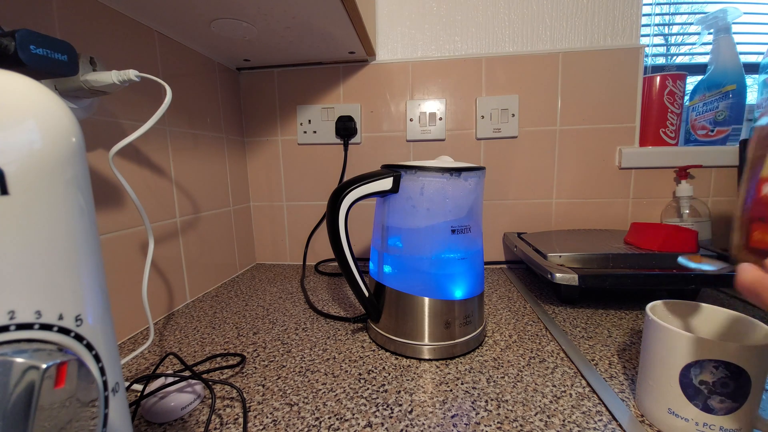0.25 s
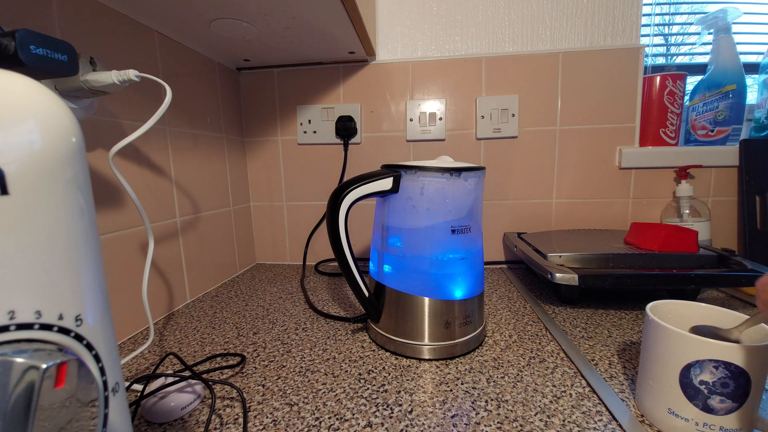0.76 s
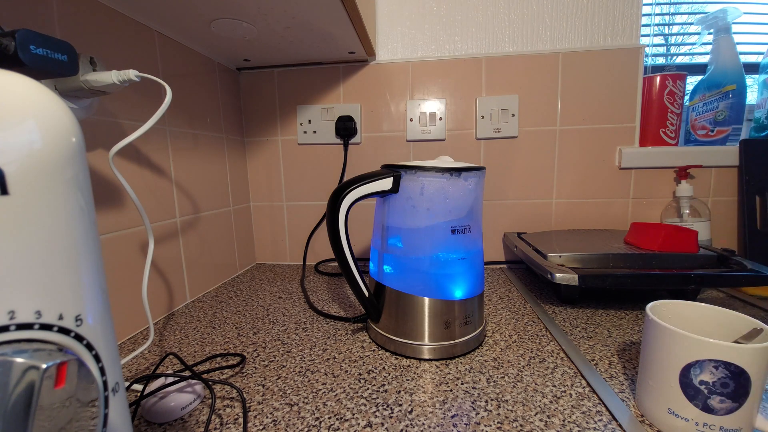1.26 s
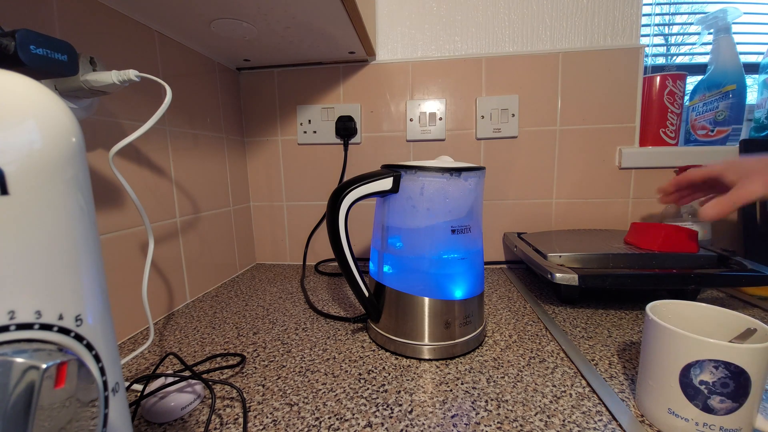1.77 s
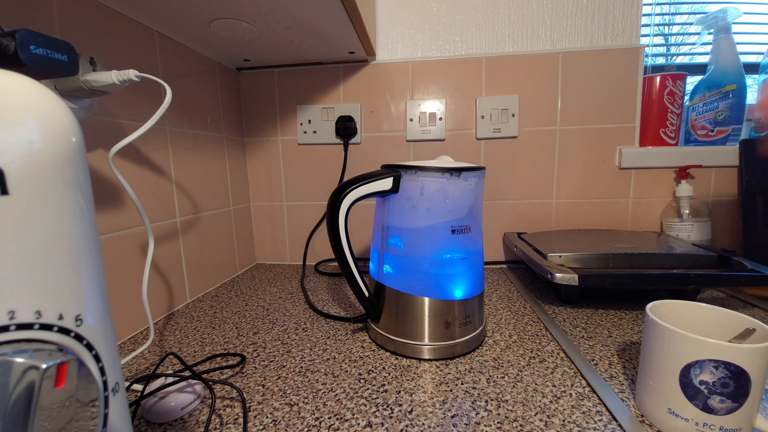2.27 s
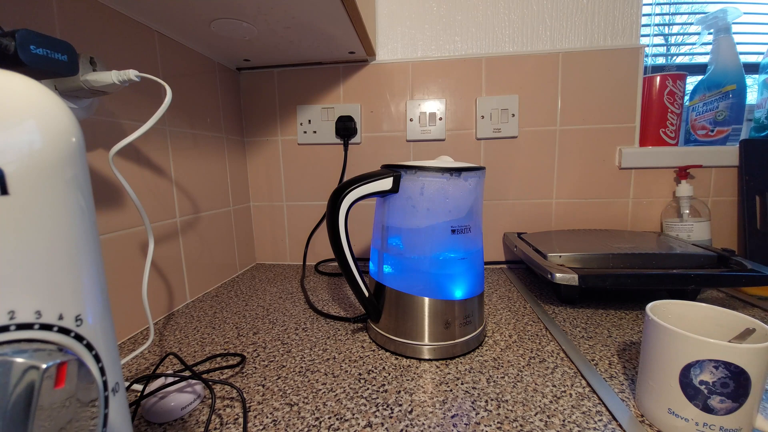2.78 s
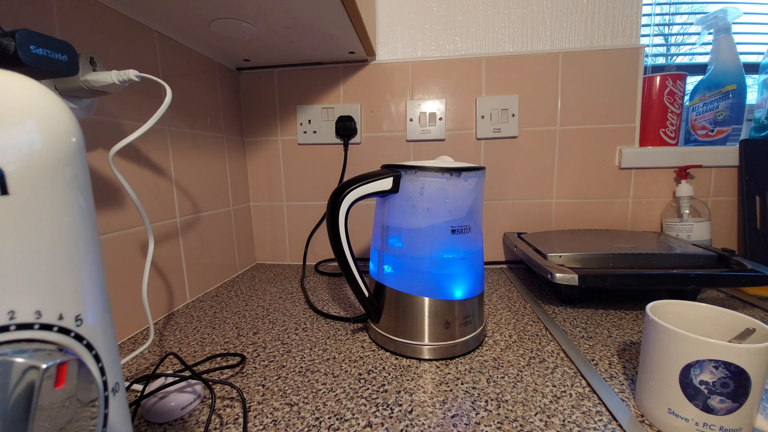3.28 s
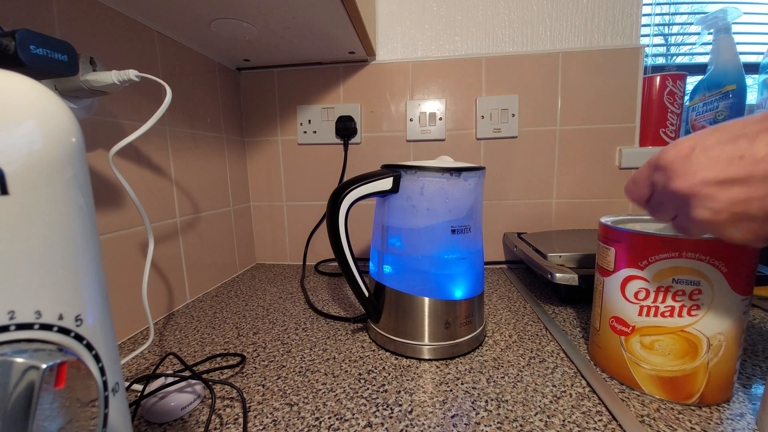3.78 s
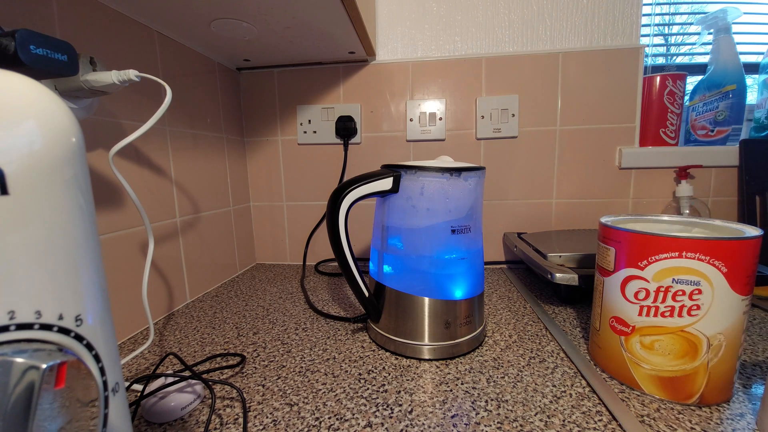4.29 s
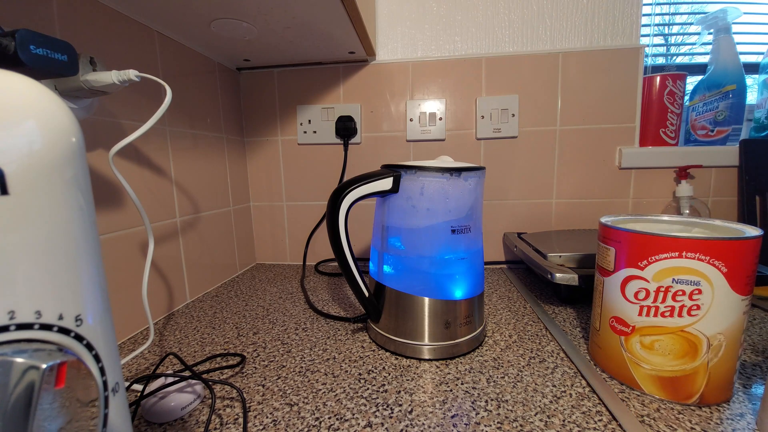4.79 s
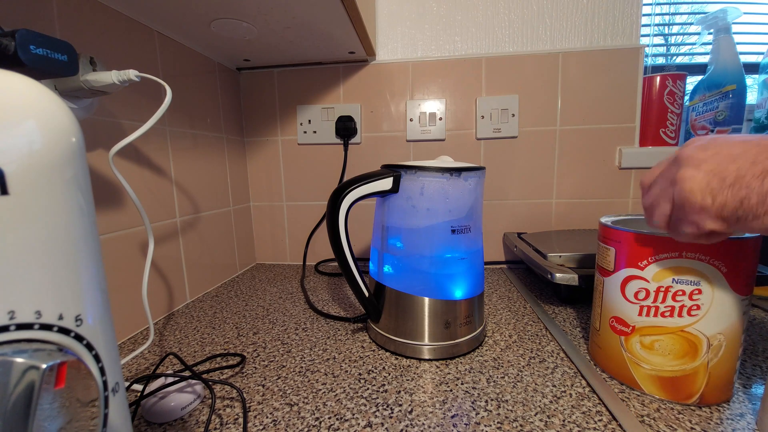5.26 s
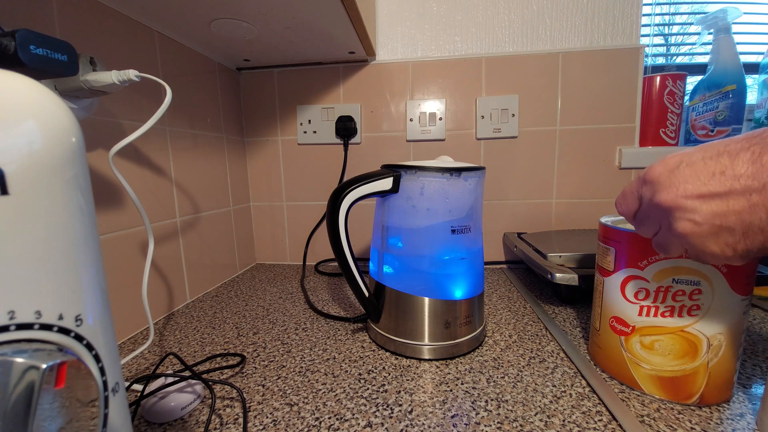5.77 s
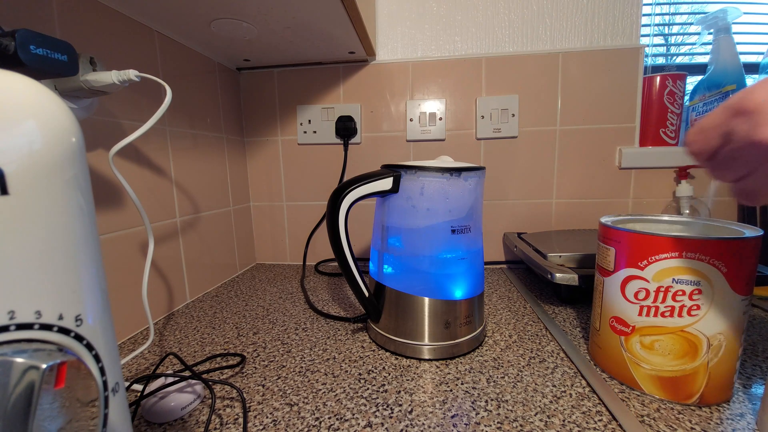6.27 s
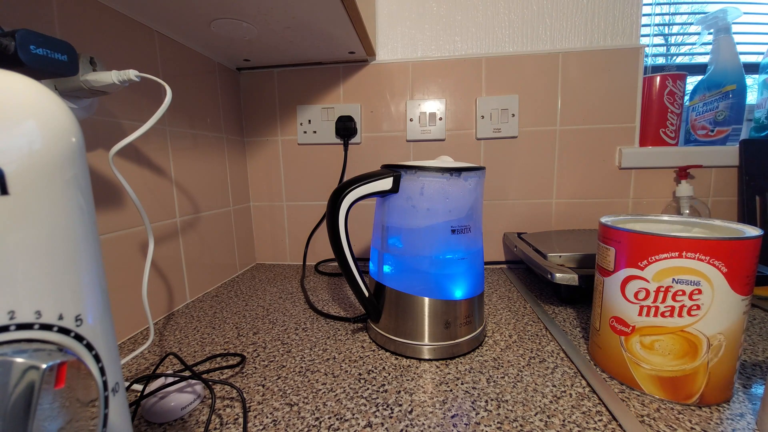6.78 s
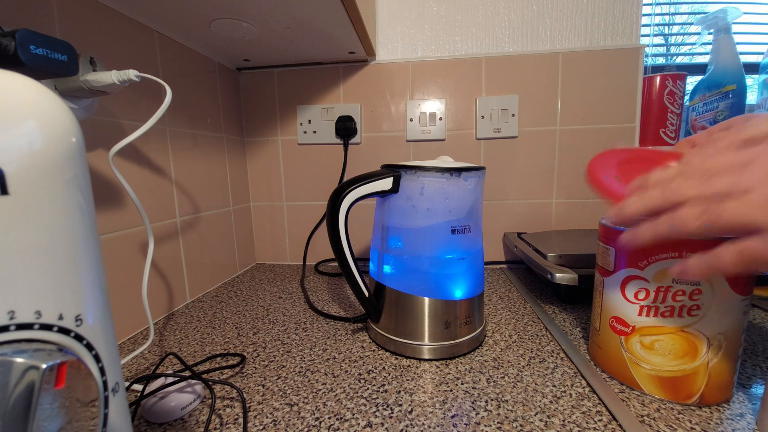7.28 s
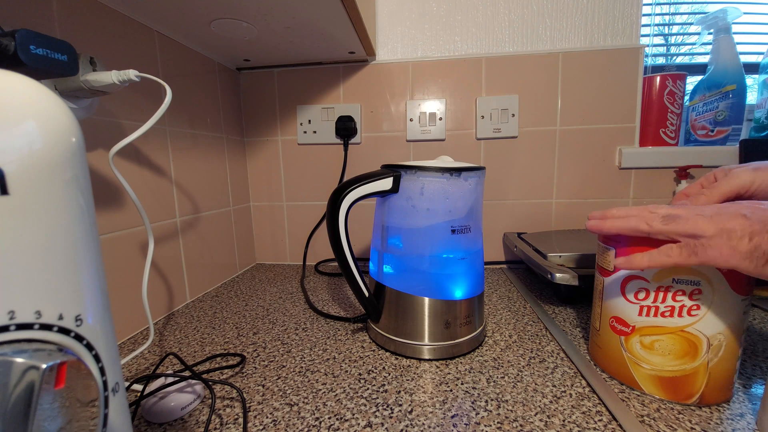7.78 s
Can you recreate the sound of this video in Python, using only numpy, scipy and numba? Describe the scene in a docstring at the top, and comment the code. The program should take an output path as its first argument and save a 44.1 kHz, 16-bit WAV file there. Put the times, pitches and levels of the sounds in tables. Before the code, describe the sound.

A faint hiss and low kettle murmur lie under close handling sounds in a small tiled kitchen, mostly to the right. At about 0.9 seconds a teaspoon touches a mug, then rattles loudly and brightly from 1.1 to 1.3, thudding into the worktop and rocking faintly to rest by 2. After a few soft knocks, a plastic lid cracks and snaps onto a hollow jar from 2.5 to 3.3, loudest near 2.8 and 3.1, with hands and sleeves rustling. At 4.6 the spoon clinks sharply with a hollow thump. A quiet stretch follows, with slight rubbing. Lighter spoon clinks come around 6.8 to 6.9, then hollow taps just after 7. From 7.4 to 8 a plastic lid is pressed onto a tub with several snaps and dull thuds. The kettle swells slightly toward the end but stays faint.

```python
"""A teaspoon clinks and rattles in a mug in a tiled kitchen: each contact rings mug and steel and thuds
into the worktop. Plastic lids are lifted and snapped onto a jar and a tub, cracking over the hollow
of the vessels. Hands and sleeves rustle, and behind them a kettle starts to murmur over a faint hiss.
Spoon and lids sound to the right of a pair of microphones on the worktop."""
import sys
import numpy as np
from scipy import signal
from scipy.fft import rfft, irfft, next_fast_len
from scipy.io import wavfile
from scipy.ndimage import uniform_filter1d
from numba import njit

SR = 44100
rng = np.random.default_rng(int(sys.argv[2]) if len(sys.argv) > 2 else 0)


def waveform_to_disk(signal):
    """Save audio, clipped to [-1, 1], as 16-bit WAV at the path in sys.argv[1]."""
    frames = np.transpose(np.atleast_2d(signal))
    scaled = np.clip(frames, -1, 1) * 32767
    samples = np.round(scaled).astype(np.int16)
    wavfile.write(sys.argv[1], SR, samples)


N = 354733
TIME = np.arange(N) / SR

# modes of worktop and vessels under a blow, low to high: pitch_hz, level_db, t60_s
BOOM_MODES = [(68.6, -20.5, 0.092), (120.7, -8.5, 0.42)]
THUD_MODES = [(184.3, -13.5, 0.16), (232.5, -0.5, 0.21), (278.3, -3.5, 0.37), (318.5, -0.5, 0.15),
              (367, 2, 0.092), (417, 0, .1)]
HOLLOW_MODES = [(513, -2.5, 0.057), (528, -4, 0.12), (578.3, -6, 0.057), (664, -7, 0.1), (782, 3, 0.062),
                (910, -2.5, 0.072), (1011, -3, 0.086)]


def undb(db):
    """Decibels to amplitude."""
    return 10 ** (np.asarray(db) / 20)


def unit(x):
    """Scale to an RMS of 1."""
    return x / np.sqrt(np.mean(x ** 2))


def shade(x, points):
    """Equalise along a curve of (freq_hz, gain_db) points."""
    size = next_fast_len(x.shape[-1])
    hz, db = np.transpose(points)[:2]
    bin_hz = np.fft.rfftfreq(size, 1 / SR) + 1
    gain = undb(np.interp(np.log(bin_hz), np.log(hz), db))
    return irfft(rfft(x, size) * gain, size)[..., :x.shape[-1]]


def band(x, hz, width_hz):
    """Two-pole resonance, gain 1 at the centre."""
    return signal.lfilter(*signal.iirpeak(min(hz, .45 * SR), hz / width_hz, SR), x)


def waver(per_s):
    """Smooth random drift with a spread near 1."""
    hold = int(SR / per_s)
    steps = np.repeat(rng.standard_normal(N // hold + 1), hold)
    return 1.3 * uniform_filter1d(uniform_filter1d(steps, hold), hold)[:N]


def stereo_noise(likeness, size=N):
    """Left and right white noise that share a part."""
    mid, side = rng.standard_normal((2, size))
    shared = np.clip(likeness, 0, 1)
    return np.sqrt((1 + shared) / 2) * mid + np.sqrt((1 - shared) / 2) * side * np.array([[1], [-1]])


@njit
def add_modes(out, start, pole, gain, rise_samples, sustain):
    """Add decaying modes with a soft attack; sustain below 1 drains their ring."""
    for m in range(len(pole)):
        phasor, push = gain[m], 0.
        for i in range(start, len(out)):
            push += (1 - push) / rise_samples
            out[i] += push * phasor.imag
            phasor *= pole[m] * sustain[i]
            if abs(phasor.real) + abs(phasor.imag) < 4e-6:
                break


def strike(out, start_s, modes, db, tilt_db=0., length=.9, rise_s=.00016, scatter_db=1.5,
           sustain=np.ones(N)):
    """Ring (pitch_hz, level_db, t60_s) modes; each blow lands elsewhere, so levels and phases scatter."""
    hz, mode_db, t60 = np.transpose(modes)
    level_draw, phase_draw = rng.standard_normal((len(hz), 2)).T
    pole = np.exp(2j * np.pi * hz / SR - np.log(1000) / (np.maximum(t60 * length, .004) * SR))
    share = undb(mode_db + tilt_db * np.log2(hz) + scatter_db * level_draw)
    gain = undb(db) * share / np.sqrt(np.sum(share ** 2) / 2)
    add_modes(out, int(start_s * SR), pole, gain * np.exp(2j * phase_draw), max(rise_s * SR, 1.), sustain)


def bursts(times, dbs, t60s):
    """Envelope of sudden starts and exponential tails."""
    envelope = np.zeros(N)
    for start_s, db, t60 in zip(times, dbs, t60s):
        i = int(start_s * SR)
        age = np.arange(min(N - i, int(1.5 * t60 * SR))) / SR
        envelope[i:i + len(age)] += undb(db - 60 * age / t60)
    return envelope


def hiss():
    """A faint, wide, steady hiss."""
    # spectrum: freq_hz, level_db
    colour = [(1180, -33), (2000, -6), (2560, -11.5), (2920, -12.5), (4880, -17), (6650, -14.5),
              (7930, -10.5), (15100, -13), (16500, -30)]
    return unit(shade(stereo_noise(.065), colour)) * undb(-78)


def tiled_walls(x):
    """Reverb that dies faster in the treble, alike left and right only in the bass."""
    # decay of the room: freq_hz, t60_s
    decay = [(100, 0.31), (300, 0.2), (1000, 0.28), (3000, 0.28), (8000, 0.18), (15000, 0.075)]
    decay_hz, decay_s = np.transpose(decay)
    age = TIME[:SR // 2]
    tail = 0
    for hz in 60 * 2 ** np.arange(0, 8.2, .5):
        t60 = np.interp(np.log(hz), np.log(decay_hz), decay_s)
        noise = stereo_noise(1 - hz / 2200, size=len(age))
        tail = tail + band(noise, hz, .57 * hz) * undb(-60 * age / t60)
    tail *= np.clip(age / .00058 - .4, 0, 1)  # echoes fade in just behind the direct sound
    tail /= np.sqrt(np.sum(tail ** 2) / 2)
    return signal.fftconvolve(x[None], tail, axes=1)[:, :N]


def kettle():
    """Water near the element murmurs through the jug's resonances; each wavers on its own."""
    # spectrum of the murmur: freq_hz, level_db
    colour = [(18, -48), (30, -14.5), (48, -8), (112, -10.5), (173, -29.5), (258, -10.5), (459, -11),
              (560, 7), (712, -10.5), (1020, -6.5), (1320, -22.5), (1810, -25), (3500, -47.5),
              (4550, -72.5), (7700, -120)]
    # jug resonances: pitch_hz, width_hz, gain_db
    resonances = [(119, 57, 8.5), (238, 50, 8.5), (570, 110, -3), (950, 160, 2.5), (1800, 230, 12)]
    # level of the low background murmur, ducking after the rattle, then slowly rising: time_s, level_db
    background_level = [(0, -64.5), (.45, -68.5), (1.3, -64), (1.55, -72), (2.3, -71.5), (3.6, -62),
                        (4.5, -61.5), (5.45, -60), (5.8, -60.5), (6.7, -60.5), (8.04, -54.5)]
    water = shade(stereo_noise(.6), colour)
    out = water * undb(1.4 * waver(13))
    for hz, width_hz, db in resonances:
        out += (undb(db) - 1) * band(water, hz, width_hz) * undb(2.7 * waver(40))
    return unit(out) * undb(np.interp(TIME, *np.transpose(background_level)))


def hands():
    """Skin and cloth slip in fine grains; the handled vessel rumbles along."""
    # rubs, with swell and fade timed over 20 dB: peak_s, swell_s, fade_s, treble_db, middle_db, rumble_db
    rubs = [(0.005, -1.5, 0.39, -59.5, -71, -66.5), (1.2, 0.18, 0.13, -74.5, -60, -38.5),
            (2.27, 0.38, 0.1, -72, -70, -66.5), (2.55, -0.03, 0.08, -50, -67.5, -62),
            (2.95, 0.33, -0.26, -68, -63, -52), (3.11, 0.12, 0.1239, -50, -43.5, -31.5),
            (3.358, 0.26, 0.26, -55.5, -50, -47), (4.67, 0.08, 0.1371, -82, -59.5, -44),
            (5.42, 0.1, 0.07, -63, -73, -61.5), (7.24, 0.69, 1.5, -85.5, -63.5, -58.5),
            (7.45, -0.01, 0, -55, -66, -53), (7.628, 0.11, 0.17, -56, -56.5, -56.5),
            (7.911, 0.1, 1, -62, -64, -66.5)]
    # spectra of the three layers: freq_hz, level_db
    treble = [(3500, -26), (5000, -4.5), (10000, -7), (16000, -6.5)]
    middle = [(700, -23), (1500, 5), (3000, -3), (5000, -6), (7000, -38)]
    rumble = [(50, -15.5), (120, -7), (280, -2), (600, -5.5), (1100, -13), (1600, -31.5)]
    shapes = [undb(-20 * np.maximum((peak_s - TIME) / max(swell, .01), (TIME - peak_s) / max(fade, .01)))
              for peak_s, swell, fade, *_ in rubs]
    out = 0
    for dbs, colour, likeness in zip(np.transpose(rubs)[3:], (treble, middle, rumble), (.2, .2, .85)):
        gain = sum(undb(db) * shape for db, shape in zip(dbs, shapes))
        gain = uniform_filter1d(gain, SR // 150)  # movements start and stop softly
        grain = undb(1.5 * waver(90))
        out = out + gain * grain * unit(shade(stereo_noise(likeness), colour))
    return out


def ticks():
    """Tiny dry ticks, each three modes that die at once."""
    # ticks: start_s, level_db, pitch_hz
    hits = [(0.275, -56, 7750), (0.652, -46.5, 7800), (5.291, -56, 12500), (7.1292, -53, 8110)]
    out = np.zeros(N)
    for start_s, db, hz in hits:
        modes = [(.85 * hz, -2, .004), (hz, 0, .004), (1.25 * hz, -3, .004)]
        strike(out, start_s, modes, db, scatter_db=0)
    return out


def vessel_air():
    """The air in jar, mug or tub booms when a rim is tapped or a lid pressed."""
    # taps and presses: start_s, level_db, pitch_hz
    taps = [(2.947, -28, 300), (3.045, -29, 308), (3.227, -27, 747), (4.598, -17, 509), (4.619, -35, 538),
            (6.761, -27.5, 740), (7.122, -24.5, 510), (7.146, -20.5, 545), (7.163, -20, 550),
            (7.182, -29, 564), (7.24, -26, 594), (7.406, -29, 211.5), (7.407, -28.5, 664),
            (7.434, -21.5, 186), (7.438, -28.5, 665), (7.643, -25, 553), (7.666, -21.5, 570),
            (7.668, -22, 230), (7.695, -28, 560), (7.714, -24.5, 598)]
    out = np.zeros(N)
    for start_s, db, hz in taps:
        strike(out, start_s, [(hz, 0, .043)], db, rise_s=.0061, scatter_db=0)
        strike(out, start_s, BOOM_MODES, db - 27, rise_s=.0054)  # the worktop underneath
    return out


def lids():
    """A knock is a crack, a short plastic ring, a treble snap, the vessel's hollow and the worktop."""
    # knocks: start_s, crack_db, crack_hz, snap_db, hollow_db, thud_db, boom_db, length_factor
    knocks = [(2.054, -63, 2060, -69.5, -54, -49, -75, 1.7),
              (2.1324, -58, 1900, -73.5, -39, -36.5, -67, 0.78),
              (2.161, -57, 1390, -75.5, -56, -44, -63.5, 0.69),
              (2.5043, -24, 1415, -25, -35.5, -57.5, -62, 0.47),
              (2.523, -23, 4140, -25.5, -26.5, -58, -66, 0.52),
              (2.5389, -29, 1643, -42, -37, -48.5, -62, 2.02),
              (2.6983, -42, 1665, -70.5, -45, -68, -66, 0.81),
              (2.7737, -32.5, 2380, -43, -40.5, -39, -49, 0.64),
              (2.7995, -33, 2360, -32.5, -39, -32, -42, 0.58),
              (2.8135, -20, 1540, -21.5, -13.5, -20.5, -58, 0.44),
              (2.88, -25, 2300, -35, -35, -31, -57, 0.46), (2.946, -51, 1830, -48, -38.5, -32.5, -49, 0.91),
              (2.9695, -49, 2670, -33, -39, -51, -57, 0.66),
              (3.0261, -40.5, 2840, -48, -50, -48, -60, 0.69),
              (3.0451, -66.5, 1700, -61.5, -55, -30, -61, 0.65),
              (3.0614, -25.5, 2630, -47, -19, -22, -60, 0.618),
              (3.0744, -22, 2109, -34, -31, -25, -41, 0.54),
              (3.0964, -15, 2314, -14.5, -13.5, -18, -39.5, 0.41),
              (3.228, -57, 1930, -68, -40, -42, -42, 0.42), (3.259, -63, 1690, -67, -32.5, -31, -44, 0.46),
              (3.29, -39, 2880, -61, -48, -37.5, -54, 1.07), (3.3552, -42, 2550, -64, -58, -53, -69, 0.93),
              (3.4697, -58, 1487, -44, -45.5, -47.5, -59, .8),
              (5.416, -63.5, 5010, -58.5, -62, -63, -52, 0.86),
              (6.864, -47.5, 1510, -58, -42, -47, -67, 0.86),
              (7.005, -47, 1500, -60.5, -47.5, -45.5, -67.5, 0.65),
              (7.4069, -48.5, 1500, -50, -43.5, -40, -46, 0.5),
              (7.433, -28, 3950, -27.5, -30.5, -30, -44.5, 0.25),
              (7.4398, -20, 1692, -28, -28, -32, -60, 0.33),
              (7.6288, -35, 4230, -40, -41.5, -49, -59, 0.54), (7.636, -29, 1800, -48, -48, -48, -58, 0.47),
              (7.6442, -52, 1860, -48.5, -39, -37.5, -57, 1.2),
              (7.6695, -38, 1430, -42, -47, -31.5, -38.5, 0.42),
              (7.701, -37, 1900, -49, -42, -41, -47.5, 0.69),
              (7.7153, -27.5, 2640, -44.5, -22, -29, -44.5, 0.32),
              (7.8732, -60.5, 2770, -53.5, -58.5, -48.5, -50.5, 1.3),
              (7.952, -38, 2500, -40, -32, -31.5, -29, 0.6)]
    # modes of a plastic lid: ratio_to_crack_hz, level_db, t60_s
    lid_modes = [(.72, -4, .03), (.86, -2, .035), (1.0, 0, .03), (1.12, -2, .035), (1.3, -3, .03),
                 (1.6, -5, .025)]
    out = np.zeros(N)
    for start_s, crack_db, hz, _, hollow_db, thud_db, boom_db, length in knocks:
        i = int(start_s * SR)
        crack = unit(band(rng.standard_normal(SR // 10), hz, width_hz=hz))[:N - i]
        fade_db = 60 * TIME[:len(crack)] / (.027 * length)
        out[i:i + len(crack)] += crack * undb(crack_db - .5 - fade_db)
        strike(out, start_s, np.array(lid_modes) * [hz, 1, 1], crack_db, length=length, rise_s=.00039)
        strike(out, start_s, HOLLOW_MODES, hollow_db, length=length, rise_s=.0012, scatter_db=8.5)
        strike(out, start_s, THUD_MODES, thud_db, length=length, rise_s=.00078, scatter_db=3.5)
        strike(out, start_s, BOOM_MODES, boom_db, rise_s=.0017)
    times, snap_dbs, lengths = np.transpose(knocks)[[0, 3, 7]]
    snap = unit(shade(rng.standard_normal(N), [(3500, -14.5), (5000, -14), (9000, -20.5), (16000, -15)]))
    return out + snap * bursts(times, snap_dbs, .069 * lengths)


def beating_pairs(hz, ring):
    """Handles split each mode into a beating pair; spoon and mug lean together, so neither rings long."""
    longest_t60_s, twin_ratio, twin_db = .3, 1.0065, -10.5
    modes = np.minimum(np.column_stack([hz, ring]), [SR, 0, longest_t60_s])
    return np.vstack([modes, modes * [twin_ratio, 1, 1] + [0, twin_db, 0]])


def favour(modes, hz):
    """The point of contact drives the modes near one frequency hardest."""
    boost_db = 10 * np.exp(-(np.log2(modes[:, 0] / hz) / .11) ** 2)
    return modes + np.outer(boost_db, [0, 1, 0])


def rocking():
    """The spoon rocks to rest, tick then tock, fainter every swing; rows like the clinks in spoon()."""
    start_s, swing_s, tock_s, swings = 1.565, .113, .049, 4
    first_db, rest_db, settle_s = -50.5, -67.5, .18
    times = (start_s + swing_s * np.arange(swings)[:, None] + [0, tock_s]).ravel()
    dbs = rest_db + (first_db - rest_db) * np.exp(-((times - start_s) / settle_s) ** 2)
    return [(s, db, db - 6.5, 6550, .35, -8.5, db - 20, 11.5) for s, db in zip(times, dbs)]


def scrape(contacts):
    """The spoon scrapes briefly at each contact, following the louder of the two rings."""
    times, mug_db, spoon_db = np.transpose(contacts)[:3]
    colour = [(800, -19), (1500, -2), (2600, 2.5), (3800, -4),  # freq_hz, level_db
              (6500, 1.5), (9500, -3.5), (13000, 2), (16000, -4)]
    envelope = bursts(times, np.maximum(mug_db, spoon_db) - 12.5, t60s=np.full(len(times), .04))
    return unit(shade(rng.standard_normal(N), colour)) * envelope


def spoon():
    """A contact can choke the old ring; it rings mug and spoon afresh and thuds through the mug's foot."""
    # spoon against mug:
    # start_s, mug_db, spoon_db, favoured_hz, length_factor, tilt_db_per_octave, thud_db, choke_db
    clinks = [(0.8661, -35.5, -43, 7500, 0.52, -1, -49, 0), (0.915, -52, -44.5, 2440, 0.87, -1, -46.5, 7),
              (1.069, -36, -45, 9000, 0.63, 0, -42, 0), (1.0805, -12.5, -28, 12400, 0.56, 3, -20.5, -3),
              (1.0935, -11, -18, 3720, 0.8, 0.5, -30.5, 23),
              (1.1096, -16, -42, 11100, 0.59, -5, -25.5, 1.5), (1.124, -17, -35, 13450, 0.54, 3, -37, -2),
              (1.136, -18, -29, 2330, 0.67, 5, -35, 2), (1.1616, -11, -42, 10000, 0.74, -3, -28.5, 5),
              (1.1789, -17, -42, 4740, 0.36, 6, -42, 6), (1.2105, -9, -19, 6980, 0.43, -2.5, -29, -4),
              (1.2175, -17.5, -35, 11300, 0.95, 4, -33, -2), (1.2345, -21, -55, 2400, 0.88, -2.5, -48, 2),
              (1.2909, -31, -30, 2400, 0.68, 1, -49.5, 2), (1.3497, -50, -53, 6980, 0.77, 4, -46, 10),
              (1.4355, -61, -60.5, 6540, 0.47, 1, -70, 8), (1.4843, -52.5, -54, 6940, 0.3, -4, -80, 6),
              (4.632, -46, -25.5, 15600, .5, 2.5, -35, -1), (4.6364, -31, -14.5, 7520, 0.51, -1, -27.5, -1),
              (4.6542, -46, -26, 2800, 0.59, -2, -31, 13.5),
              (6.7575, -45, -31, 15400, 0.68, 0.5, -41.5, -0.5),
              (6.89, -35, -29.5, 11400, 0.65, -3.5, -44.5, 0),
              (6.8945, -30, -23, 15400, 0.47, 1.5, -37, 0.5), (6.9144, -39, -36, 6300, 0.8, -1.5, -42, 11)]
    # modes of mug and spoon: pitch_hz
    mug_hz = [2428, 3671, 4037, 4883, 5163, 6331, 6971, 7300, 8409, 8737, 9884, 10050, 11225, 11330, 11655,
              12080, 12560, 13450, 13750, 14330, 15090, 15580]
    steel_hz = [2466, 2610, 2751, 4048, 5173, 6412, 6988, 7488, 7639, 8409, 9932, 11390, 12000, 12600,
                15120, 15600]
    # strength and decay of those modes: level_db, t60_s
    mug_ring = [(-8, 0.16), (-26.5, .25), (-28, 0.067), (-9.5, 0.14), (-17.5, 0.37), (-18, .3), (-6, 0.46),
                (-23, .25), (-16, 0.44), (-7.5, 0.066), (-15, 0.4), (-7.5, 0.38), (-10, 0.9), (-11, .3),
                (-9, .3), (-10, 0.32), (-13.5, 0.25), (-5.5, 0.38), (-17, .25), (-21.5, .2), (-18, .2),
                (-22.5, .2)]
    steel_ring = [(-6, .2), (-0.5, 0.04), (-9, .22), (-9.5, 0.25), (-11.5, 0.7), (-3.5, 0.32), (-10.5, .2),
                  (-15.5, 0.078), (-5.5, 0.13), (-22.5, 0.076), (-15, 0.28), (-6, 0.36), (-11, 0.073),
                  (-5.5, 0.22), (-11, .15), (-2.5, .12)]
    # a clink already dying away at the start: pitch_hz, level_db, t60_s
    opening_ring = [(5200, -12, 0.27), (8750, 1, 0.24), (13260, 5, 0.47), (15530, -2, 0.33)]
    mug, steel = beating_pairs(mug_hz, mug_ring), beating_pairs(steel_hz, steel_ring)
    contacts = clinks + rocking()
    thuds, ring, sustain = np.zeros(N), np.zeros(N), np.ones(N)
    touch = SR // 300  # samples of damping just ahead of a contact
    for start_s, *_, choke_db in contacts:
        i = int(start_s * SR)
        sustain[i - touch:i] = undb(-max(choke_db, 0) / touch)
    for start_s, mug_db, spoon_db, hz, length, tilt_db, thud_db, _ in contacts:
        for modes, db, scatter_db in ((mug, mug_db, 1.7), (steel, spoon_db, 2.2)):
            strike(ring, start_s, favour(modes, hz), db, tilt_db, length,
                   rise_s=.003, scatter_db=scatter_db, sustain=sustain)
        strike(thuds, start_s, THUD_MODES + HOLLOW_MODES, thud_db, tilt_db=-.5, rise_s=.0028, scatter_db=1)
        strike(thuds, start_s, BOOM_MODES, thud_db - 24.5, rise_s=.0032)
    strike(ring, 0, opening_ring, db=-49.5)
    scrapes = scrape(contacts)
    chatter = undb(1.8 * waver(450))  # the loose spoon buzzes against the glaze and roughens the ring
    return thuds + ring * chatter + scrapes


def scene():
    """Spoon and lids reach the right microphone first; room, hands, kettle and hiss spread around them."""
    # delay at the left microphone as the hands move: time_s, lag_ms
    left_lag = [(0, 0.17), (2.0, 0.32), (2.45, 0.45), (2.75, 0.31), (3.0, 0.055), (4.5, 0.1), (6.5, 0.33),
                (7.0, 0.24), (8.04, 0.23)]
    # tone of the left side against the right: freq_hz, gain_db
    left_colour = [(60, 4), (125, -6.5), (300, 0), (2000, 2.5), (4000, -3.5), (8000, -1.7), (12000, -5)]
    right = spoon() + lids() + vessel_air() + ticks()
    lag = np.round(np.interp(TIME, *np.transpose(left_lag)) * SR / 1000).astype(int)
    left = shade(right[np.clip(np.arange(N) - lag, 0, N - 1)], left_colour)
    return np.array([left, right]) + hiss() + undb(-4) * tiled_walls(right) + hands() + kettle()


def record(dry):
    """The small microphones lose the deepest bass; the recorder rounds the peaks and cuts the top."""
    low_hz, top_hz, ceiling = 45, 15900, .9
    thinned = signal.lfilter(*signal.butter(2, low_hz, "high", fs=SR), dry)
    rounded = ceiling * np.tanh(thinned / ceiling)
    return signal.sosfilt(signal.ellip(10, .2, 70, top_hz, fs=SR, output="sos"), rounded)


dry = scene()
out = record(dry)
waveform_to_disk(out)
```